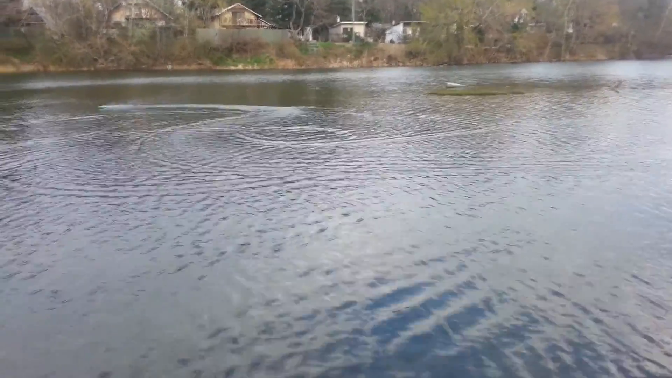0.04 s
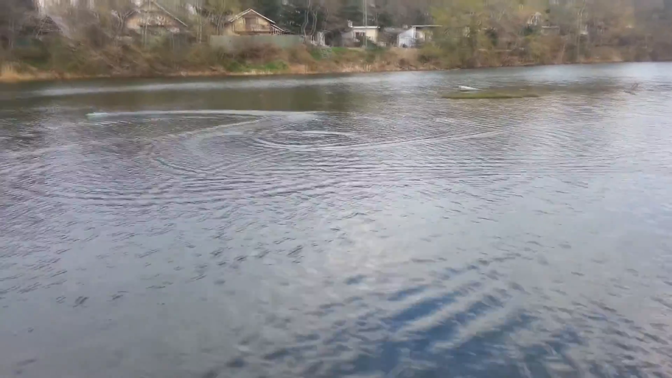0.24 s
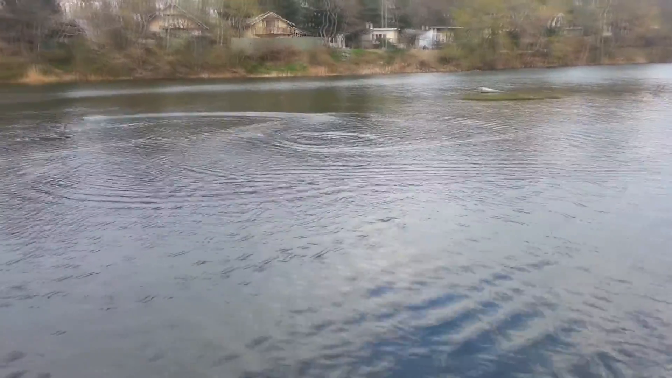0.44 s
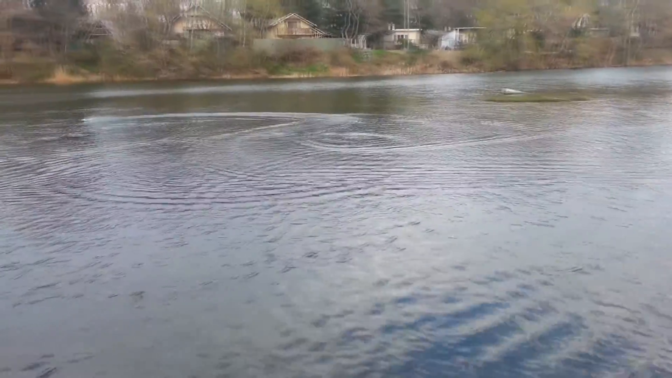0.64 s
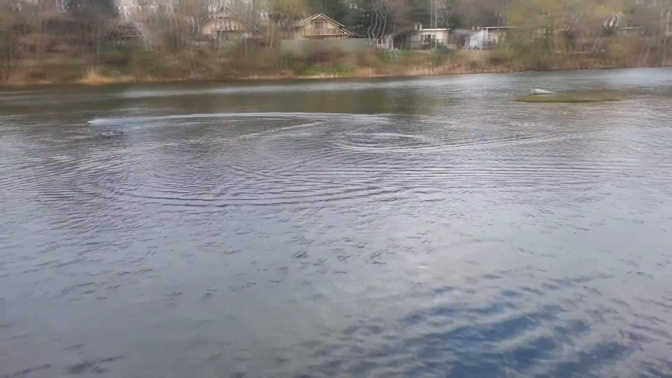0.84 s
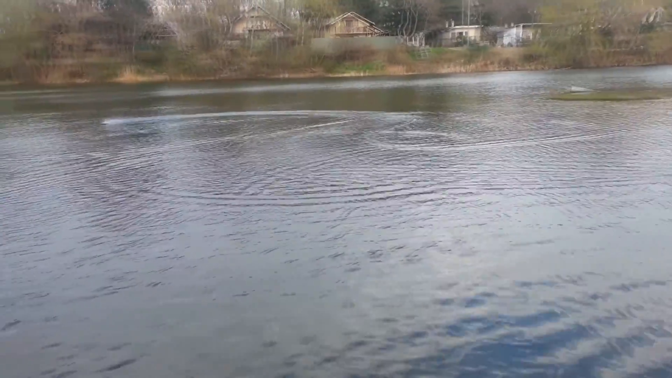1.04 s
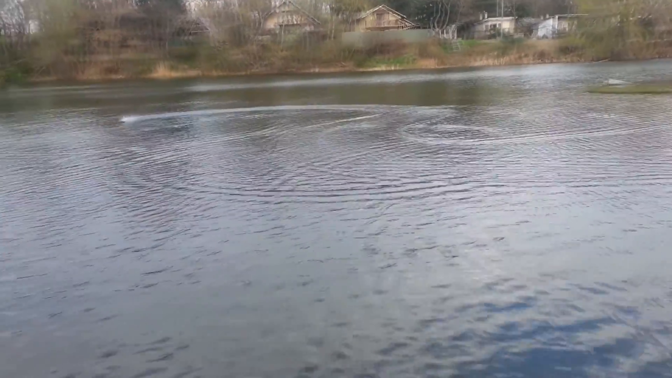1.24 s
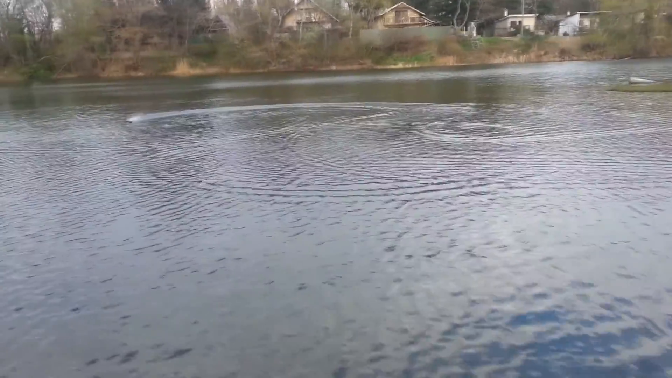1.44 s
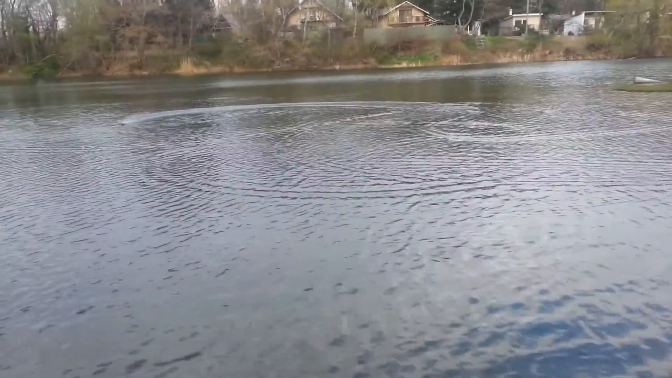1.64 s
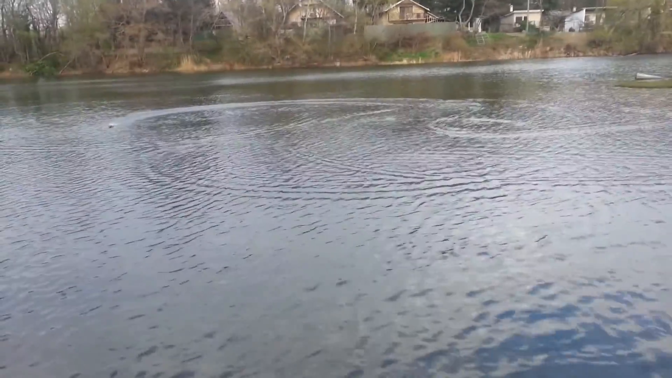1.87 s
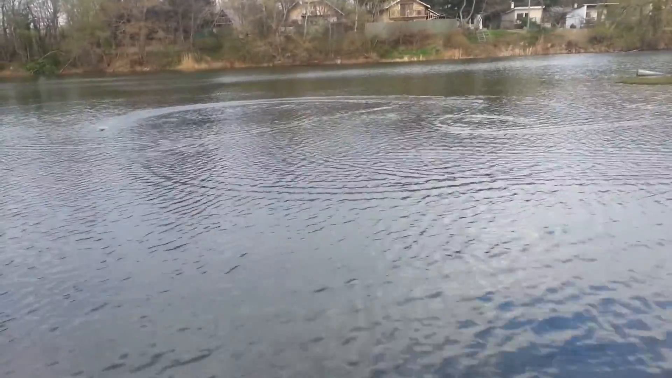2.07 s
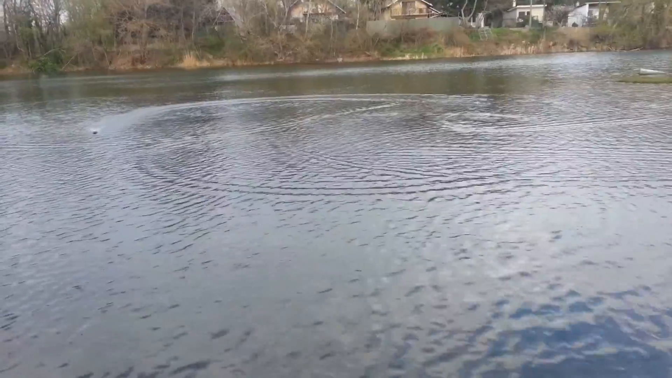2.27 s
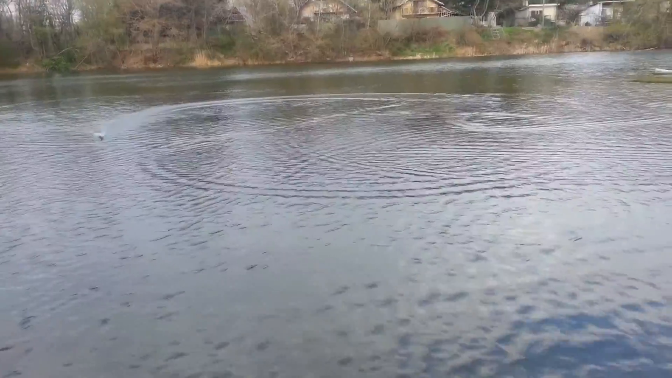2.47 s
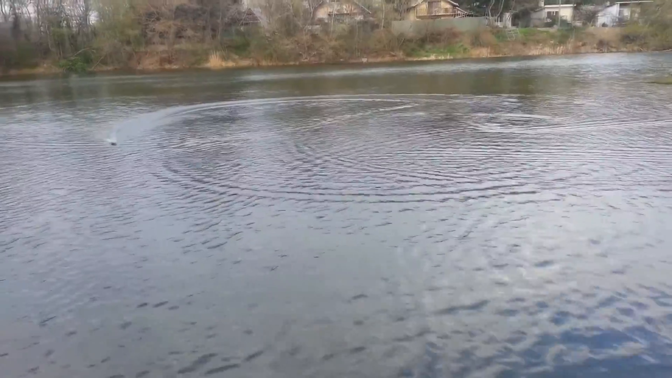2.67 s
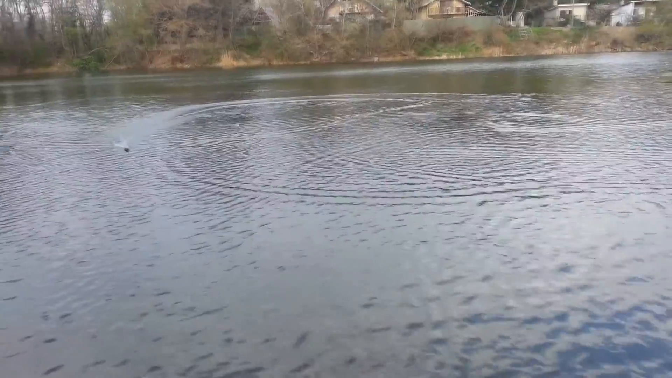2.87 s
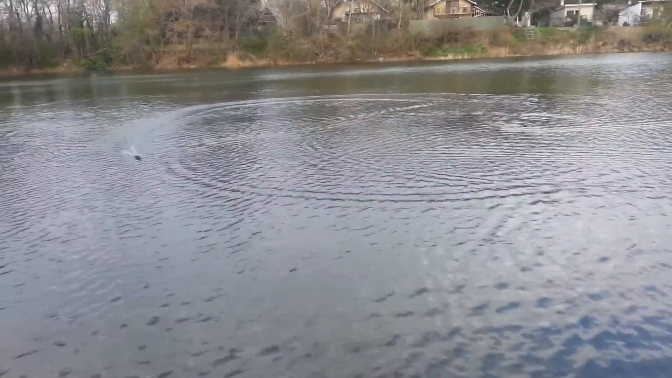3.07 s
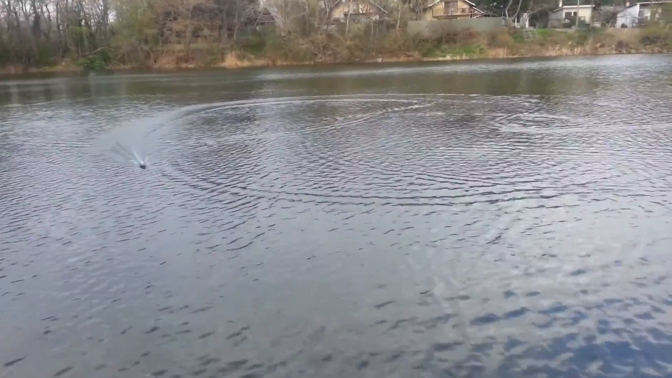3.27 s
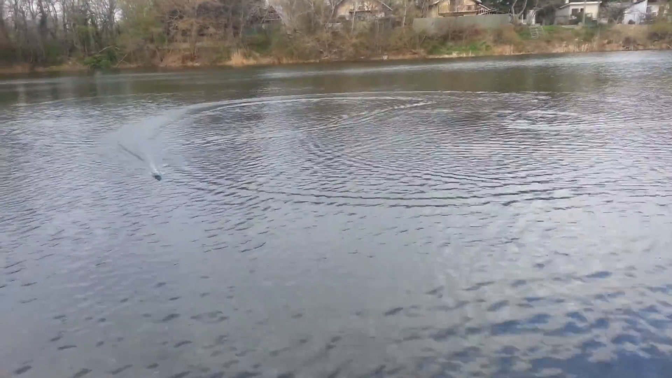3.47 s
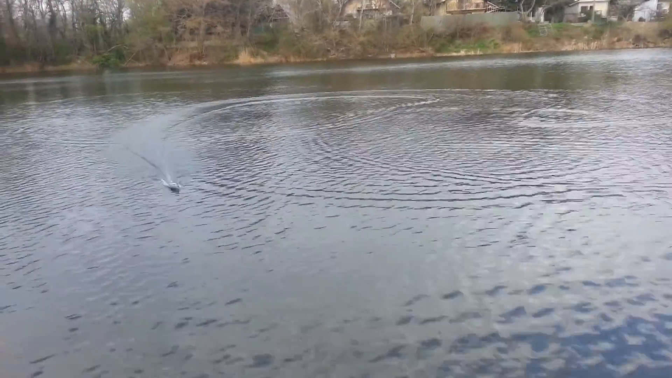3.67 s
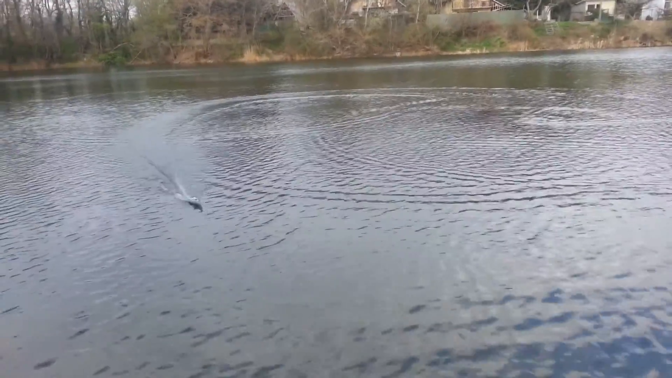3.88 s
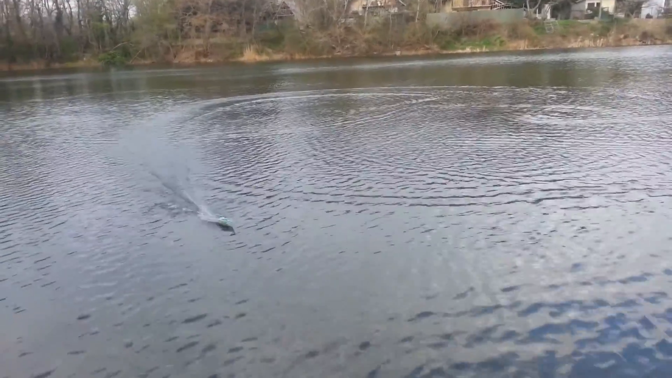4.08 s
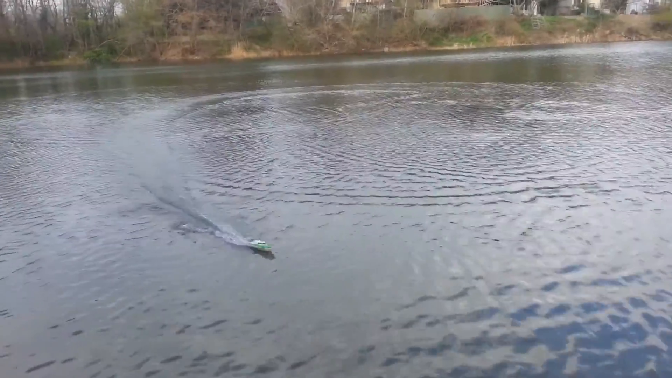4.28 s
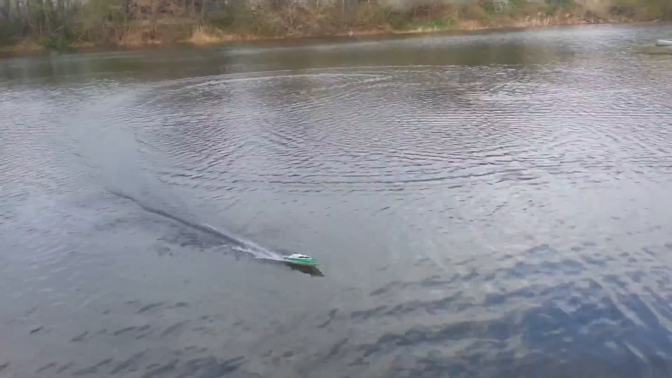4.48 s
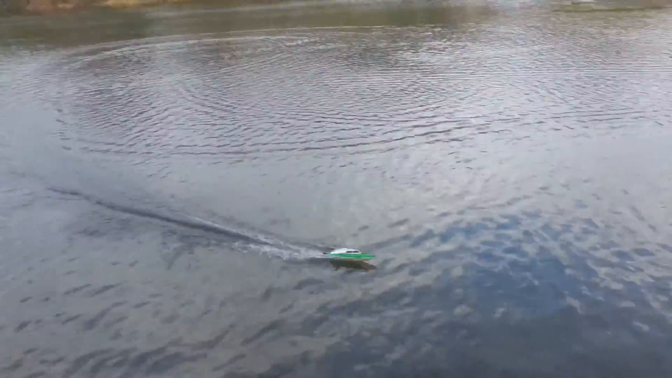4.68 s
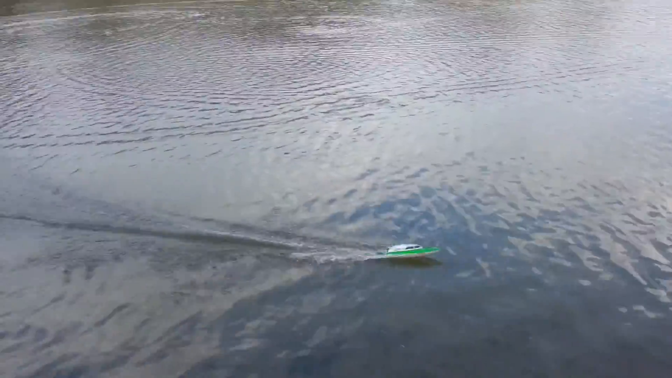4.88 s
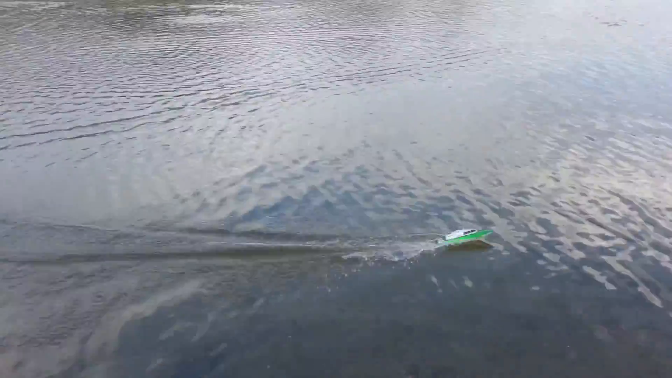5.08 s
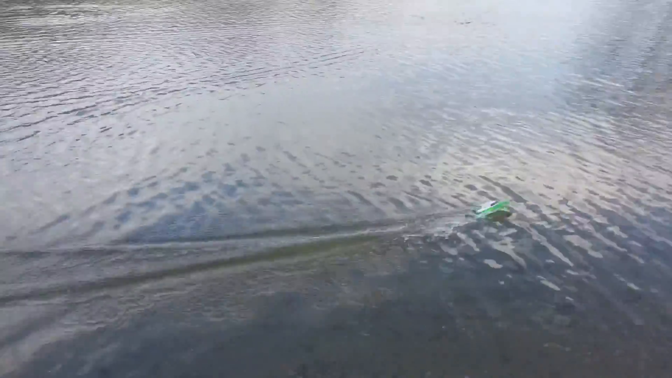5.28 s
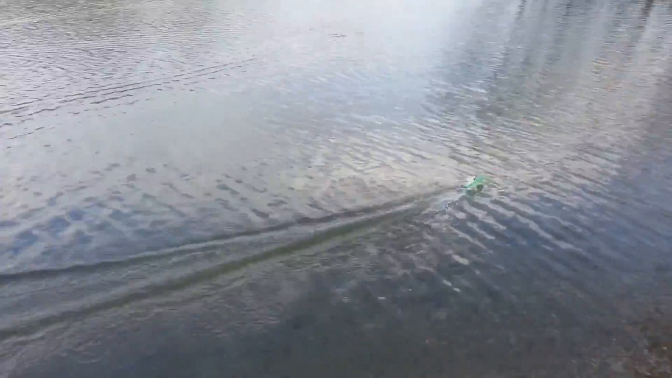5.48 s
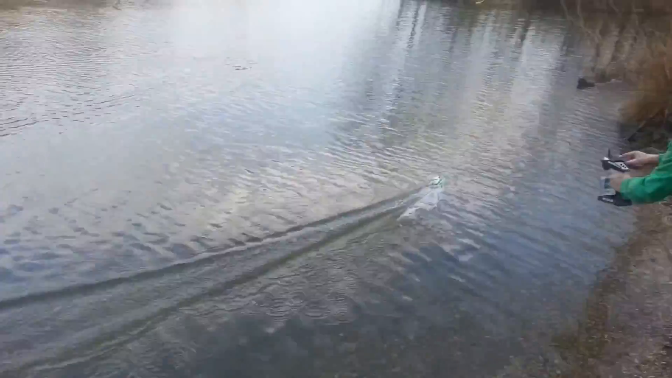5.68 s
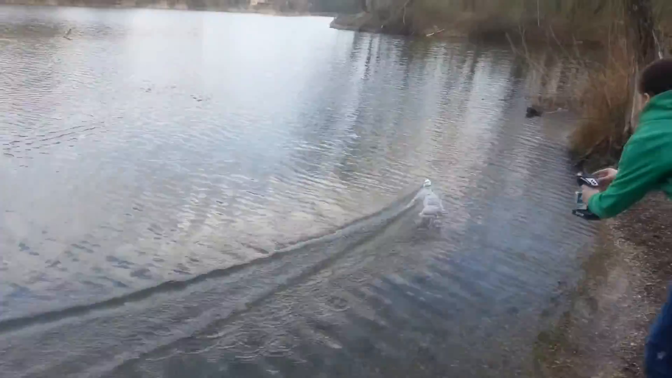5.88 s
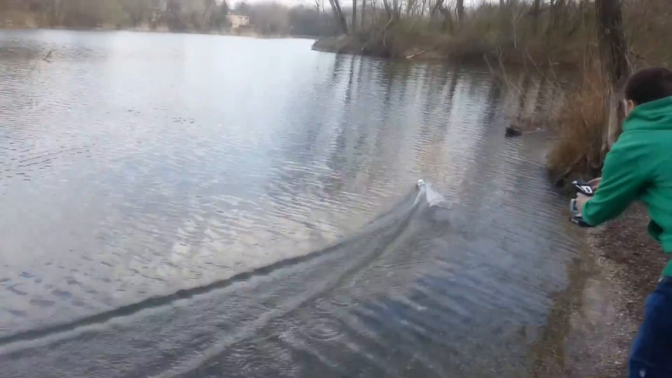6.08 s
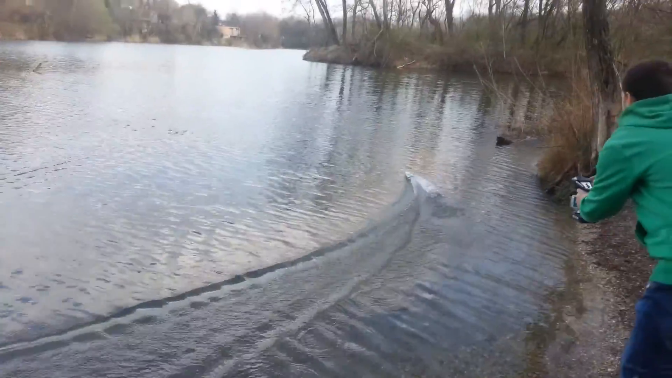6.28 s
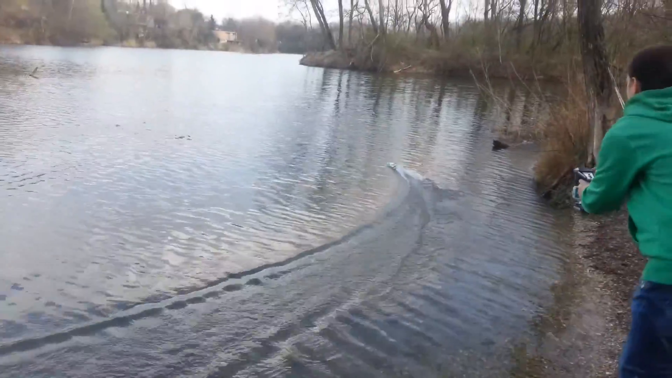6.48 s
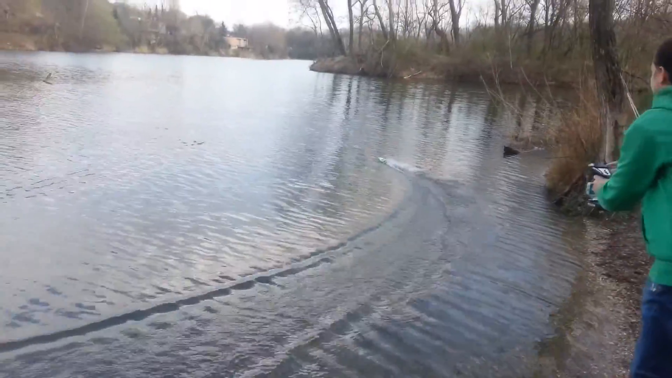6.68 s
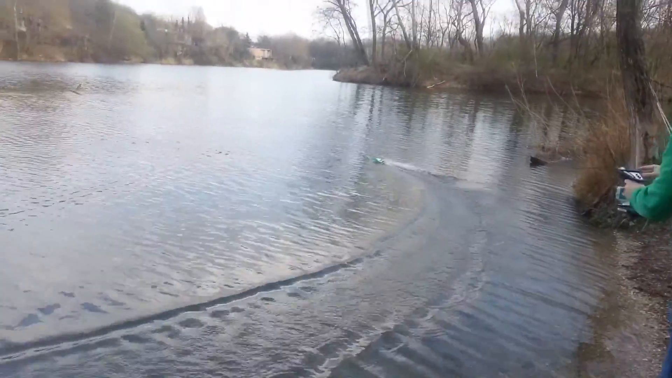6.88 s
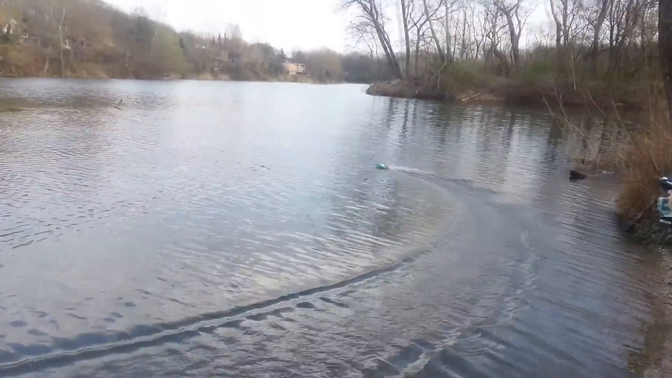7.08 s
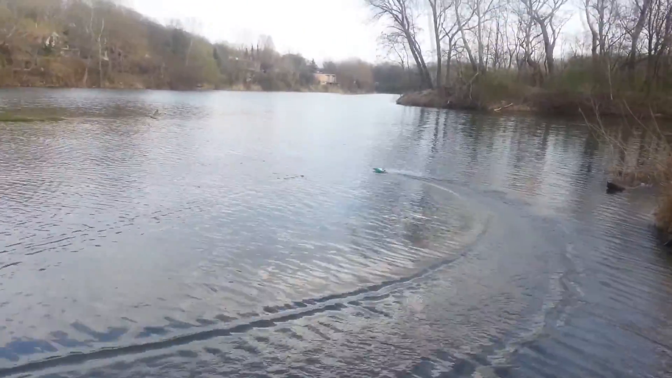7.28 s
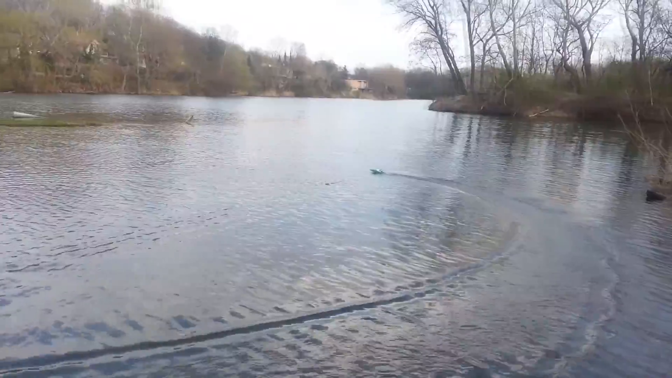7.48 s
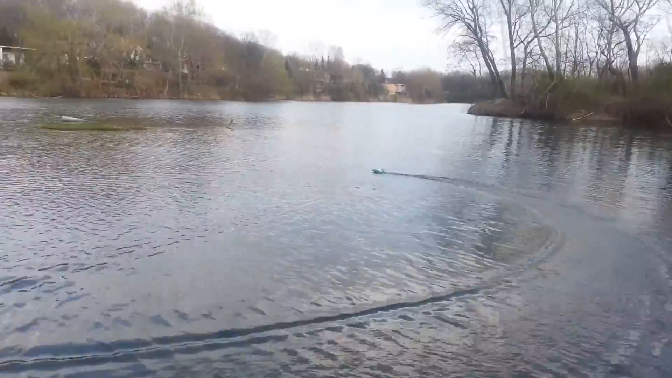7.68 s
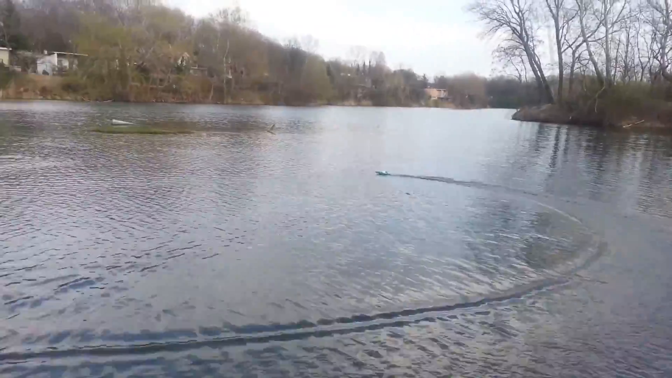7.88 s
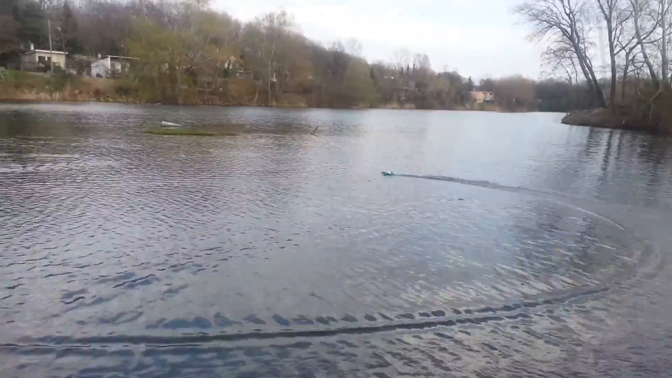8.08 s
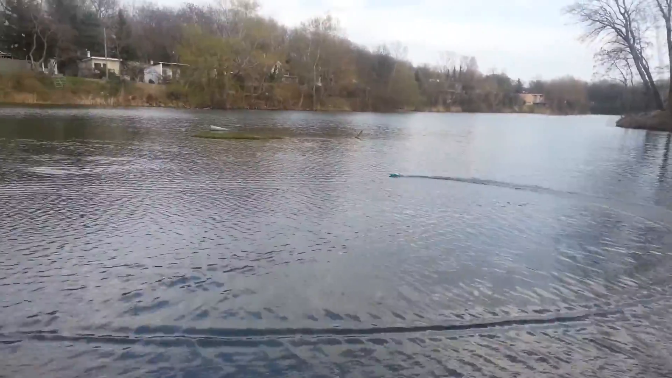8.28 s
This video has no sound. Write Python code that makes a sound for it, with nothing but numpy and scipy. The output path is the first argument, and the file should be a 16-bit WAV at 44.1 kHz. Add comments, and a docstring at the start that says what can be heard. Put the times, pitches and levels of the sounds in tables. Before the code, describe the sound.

A faint, nearly constant-pitched electric whine and propeller buzz carry across open water, wavering slightly. Splashy hiss pulses several times a second and builds as the model boat approaches. The close pass is loudest, with dense churning, crackling bubbles and bright spray; the pitch then slips down only slightly as the boat heads off and quiets. Stereo shore microphone, open air, soft distant rumble, occasional small water plops.

```python
"""A thin electric whine and a hiss of spray come from some 30 m out over a lake: a model speedboat at full throttle.
It loops in close to the shore, 4 m off at its nearest, and heads away. Shaft harmonics make the whine,
a chattering series of higher orders the propeller buzz, and shaped noise the churn, spray and mist.
Slaps on the ripples make the hiss surge and the motor sag. Bubbles, ticks and a far rumble lie around it.
The microphone is a two-port camera on the shore, whose body shades and delays the sound by bearing."""
import sys
import numpy as np
from scipy import signal
from scipy.fft import rfft, irfft
from scipy.io import wavfile
from scipy.ndimage import uniform_filter1d

SR = 44100
rng = np.random.default_rng(int(sys.argv[2]) if len(sys.argv) > 2 else 0)


def master(y):
    """Save y as 16-bit WAV."""
    cut = np.clip(np.atleast_2d(y).T, -1, 1)
    pcm = np.round(cut * 32767)  # scale
    wavfile.write(sys.argv[1], SR, pcm.astype(np.int16))


N = 367353

# Distant outdoor rumble, relative colour: pitch_hz, level_db (per Hz)
RUMBLE_COLOUR = [(20, -22), (33, -14), (48, -2.5), (59, 3.5), (78, -4), (120, -0.5), (160, -3.5), (270, -4),
                 (400, -9.5), (550, -16.5), (1000, -8), (1800, -16.5), (5000, -44)]
# Small ticks and plops of water: start_s, level_db, pitch_hz, swell_s
TICKS = [(.1993, -27.5, 5130, 0.00024), (2.128, -34.5, 4720, 0.0003), (8.028, -33, 4450, 0.00026),
         (1.902, -50, 504, 0.0011), (4.464, -37, 2420, 0.002), (4.65, -33, 2380, 0.002),
         (4.762, -38, 1760, 0.004), (5.088, -40, 1294, 0.0027), (7.683, -43, 2360, 0.0022),
         (8.176, -37, 4600, 0.0006), (8.179, -45, 1750, 0.002)]

# Boat to camera: time_s, distance_m
DISTANCE = [(0, 32), (1.5, 29.4), (2.1, 25.5), (2.7, 17.1), (3.3, 13.8), (3.9, 10.74), (4.4, 6.75),
            (4.9, 4.28), (5.3, 4.92), (5.8, 7.14), (6.3, 10.5), (6.9, 12), (7.5, 18.6), (8.33, 22.9)]
# Side of the boat facing the shore: time_s, side (0 bow, 1 beam, 2 stern; clipped to that range)
ASPECT = [(0, 0.16), (3.9, 0.16), (4.7, 1), (5.15, 1.09), (5.7, 1.64), (6.3, 2.18), (8.33, 1.84)]
# Shaft speed before sag and wobble, slower in the turns, with the Doppler drop of the pass: time_s, speed_hz
SHAFT_SPEED = [(0, 287.2), (0.3, 285.2), (0.7, 290.9), (1.3, 291.3), (1.7, 289.2), (2.3, 288.7),
               (3.1, 290.4), (3.3, 286), (3.55, 286.6), (3.75, 289), (3.95, 291.7), (4.7, 288),
               (5.0, 287.8), (5.35, 284.1), (6.0, 284.7), (7.2, 283.7), (7.8, 286.4), (8.33, 283)]
# Slaps of the hull on the ripples: start_s, hold_s, spray_db (more thrown), bite_db (deeper propeller bite)
SLAPS = [(0.153, 0.056, -0.5, 1.66), (0.548, 0.022, 2.5, 1.9), (0.73, 0.04, 2, 1.0),
         (0.967, 0.082, 3, 1.58), (1.144, 0.014, 3, 0.47), (1.351, 0.024, 1, 0.1), (1.54, 0.057, 5, 3),
         (1.762, 0.043, 3.5, 3), (1.922, 0.066, 5.5, 2.5), (2.057, 0.1, 2.5, 0.5),
         (2.338, 0.035, 1.5, -0.35), (2.705, 0.016, 1.5, 3.5), (2.886, 0.051, 4, 0.9),
         (3.109, 0.05, 3, 1.07), (3.301, 0.03, 4.5, 2.0), (3.437, 0.04, 2.5, 5.0), (3.616, 0.051, 4, 5),
         (3.805, 0.05, 6.5, 3.5), (4.006, 0.05, 6, 3.5), (4.195, 0.055, 3, 2), (4.401, 0.03, 2, 1),
         (4.574, 0.048, 1, 2.5), (4.782, 0.021, -0.7, 3.5), (4.975, 0.049, 3, 4), (5.143, 0.056, 0.5, 3),
         (5.259, 0.02, 1, 2), (5.339, 0.033, 3.5, 3.5), (5.53, 0.029, 0.5, 1.5), (5.696, 0.0085, 2.5, 2.5),
         (5.848, 0.037, 2.5, 2), (6.223, 0.059, 1.5, 2.5), (6.476, 0.063, 1, 1), (6.66, 0.039, 1.5, 0.5),
         (7.865, 0.051, 0, 1), (8.143, 0.0082, 2, 5.5)]
# Propeller load, heavy at the start and again just before the pass: time_s, level_db (more churn and buzz)
LOAD = [(0, 3.5), (1.4, -0.5), (2.5, 0.5), (3.6, 0.7), (4.55, 2.5), (5.1, -0.5), (5.75, -0.5), (6.3, 0.5),
        (7.1, 0), (8.33, 2)]

# How each part carries: bow_db, beam_db, stern_db (each at 10 m), loss_db (per doubling of distance),
# bow_on_db, stern_on_db (changes at those moments), surge_db (per dB of surge)
CHURN_CARRY = (-53.5, -54.5, -54, 6, 0.5, -2.5, 0.7)  # water churned by the propeller
SPRAY_CARRY = (-47.5, -53, -48.5, 5.5, 1.5, -2, 1.02)  # hiss of the spray
MIST_CARRY = (-63, -66, -59, 8.5, -1, -2.5, 0.63)  # finest spray, strongest from the rooster tail behind the boat
BUZZ_CARRY = (-50.5, -52, -48.5, 7, -1, -7, 1.0)  # rough buzz of the propeller
# Low shaft orders radiated by the hull: order, swing_db (as it rocks), rough (0-1, beam-on, before division
# by order), hop_db (lost from afar in each hop; negative gains), then the columns of CHURN_CARRY
WHINE = [(1, 0.79, 0.041, -1, -56.5, -57.5, -68.5, 10.35, -2.5, 6, 0.62),
         (2, 1.3, 0.54, 3, -61, -63.5, -57.5, 3.96, -11, -3.5, 0.63),
         (3, 0.88, 0.48, 3, -66, -73.5, -57.5, 1.94, -6.5, -0.5, 0.71),
         (4, 1.55, 0.3, -4, -57, -61, -68, 8.6, 2, 7, -0.8),
         (5, 0.21, 0.17, 15, -55, -50.5, -52, 7.3, -5.5, -9.5, 0.052)]
# Higher propeller orders, relative to the buzz: order, bow_db, beam_db, stern_db
SHAFT_ORDERS = [(6, -14, -13.5, -13.5), (7, -9, -11, -9.5), (8, -15, -12.5, -10.5), (9, -14, -7.5, -16.5),
                (10, -11, -16, -11.5), (11, -15, -18.5, -15), (12, -16.5, -21, -19), (13, -15, -23, -9),
                (14, -14.5, -17.5, -14), (15, -10, -15.5, -16), (16, -12, -19, -11), (17, -2.5, -26, -12),
                (18, -17, -20, -9)]
# Brief swells and dips of single shaft orders: centre_s, order, half_length_s, level_db
SWELLS = [(0.038, 3, 0.036, 11.5), (0.217, 3, .045, 8), (0.247, 7, 0.28, 3), (0.265, 5, .045, -12),
          (0.37, 2, .07, 5), (1.095, 7, .4, -5), (3.265, 5, 0.036, -5), (3.34, 7, 0.041, 7),
          (3.384, 6, .02, 7), (3.478, 11, .025, 10), (3.486, 7, .035, 5), (3.691, 7, .04, 5),
          (3.658, 3, .03, 6), (3.675, 8, .03, 9), (3.742, 10, 0.018, 8), (3.851, 2, 0.039, 5.5),
          (3.856, 11, 0.018, 10), (3.857, 8, .022, 13), (3.868, 3, 0.036, 6), (4.034, 10, .014, 6),
          (4.05, 8, .025, 7), (4.055, 11, 0.033, 11.5), (4.06, 3, .045, 6.5), (4.08, 2, .04, 8.5),
          (4.24, 7, 0.022, 11.5), (4.262, 6, .03, 5), (4.454, 6, .03, 4), (4.527, 10, .025, 12),
          (4.601, 9, .013, 5), (4.642, 6, 0.036, 6), (4.648, 10, .014, 11), (4.696, 2, 0.015, -6),
          (4.723, 5, 0.025, 3.5), (4.825, 6, .014, 10), (5.04, 5, 0.03, 2.5), (5.08, 3, 0.023, 15),
          (5.097, 5, 0.028, -4.5), (5.175, 9, .025, 5), (5.21, 10, 0.021, 4), (5.26, 5, .012, -9),
          (5.294, 8, 0.018, 8), (5.3, 4, .2, -10), (5.33, 5, 0.01, -15), (5.503, 7, .025, 10),
          (5.515, 5, .018, -10), (5.566, 8, 0.02, 10), (5.625, 5, 0.022, -10), (5.68, 7, .03, 12),
          (5.727, 2, 0.098, -10), (5.9, 8, .025, 9), (5.901, 2, 0.031, 6), (6.105, 5, 0.028, -5),
          (6.41, 6, 0.039, 12), (6.5, 3, 0.027, 7.5), (6.619, 6, 0.049, 5), (6.636, 5, 0.023, -11),
          (6.652, 10, .03, 8), (6.903, 2, 0.038, 6.5), (7.69, 2, 0.039, -8), (7.703, 5, .04, -7),
          (8.231, 6, 0.083, 9), (8.3, 5, .15, -5)]

# Relative colour of churn and spray: pitch_hz, bow_db, beam_db, stern_db
WATER_COLOUR = [(394, -18.5, -6, -11.5), (790, -14.5, -7.5, -8), (1330, -15, 4.5, -10),
                (2290, -6.5, 9.5, 4), (2390, -11.5, 9, -2), (2700, -6.5, 7.5, -3), (3360, -5, 3, -3.5),
                (3630, -9.5, 1, -1.5), (3820, -2, 1.5, -1), (4720, 6.5, 3, 5), (5330, 9.5, -1.5, 0.5),
                (5820, 5.5, -2, 3), (6260, -2.5, -5, -5), (6460, -7, -3.5, -6), (7030, -10, -6.5, -11.5),
                (7800, -17, -10, -12.5), (8200, -17, -9, -11.5), (10660, -17.5, -7, -14.5),
                (12300, -26.5, -10, -9), (13935, -30, -23, -19)]
# Moving bands of the water noise: time_s, pitch_hz, lift_db
HOLLOW = [(4.2, 2804, -5), (4.48, 2613, 3), (5.0, 2420, 4), (5.55, 2253, 3), (5.85, 2200, -1),
          (6.3, 2081, -3.5), (7.3, 2115, -1)]  # hollow ring of the churn under the hull, mostly sinking through the pass
MIRROR = [(4.3, 5887, 2), (4.6, 6650, 5), (4.9, 7846, 4), (5.3, 7600, -1.5)]  # hiss sweeping through the pass, as from a reflection off the lake
TAIL = [(4.6, 5602, -1), (5.0, 5297, 5), (5.75, 5480, 5), (6.3, 5230, 4.5), (7.0, 5100, 2.5),
        (8.33, 5154, 2)]  # rooster-tail hiss, lower as the boat turns away
SIZZLE = [(4.9, 6100, -4), (5.4, 6200, 2), (6.2, 6260, -4), (6.8, 6636, 4)]  # thin sizzle above it, rising as the boat heads away
# Sheet of spray thrown in the near turn: centre_s, half_length_s, pitch_hz, width_hz, level_db
SHEET = (5.9, 0.055, 4040, 490, 6)

# Boat's bearing, as the delay of the left port: time_s, lag_ms
BEARING = [(0, 0.21), (2.8, 0.21), (3.8, 0.16), (4.3, 0.14), (4.8, 0.071), (5.3, 0.026), (5.8, 0.0054),
           (6.5, 0.03), (8.33, 0.029)]
# Left port minus right: pitch_hz, aside_db (boat to one side), ahead_db (boat ahead)
PORT_TILT = [(280, -2.5, 1), (398, 5, -2), (567, 12, 13.5), (850, 5, 2.5), (1490, 11, 7), (2270, 17, 12),
             (2406, -3, 0), (2740, 15, 17), (3420, 3.5, 4.5), (4400, 16, 7), (5250, 11.5, -1),
             (6060, 5.5, -9), (7500, -11, 2.5), (9600, 1.5, -1.5), (13000, 4, 4)]
# Phase lead of the left port, beyond the bearing: pitch_hz, aside_rad, ahead_rad
PORT_PHASE = [(380, 0, 0), (600, 0.4, 0.3), (1150, 0.9, 1.1), (1600, 0.2, 1.1), (2050, 1.0, 1.1),
              (2300, -0.8, 0.8), (2900, 1.3, 1.2), (3250, -0.6, -1.1), (3750, 1.4, 0.8), (4600, -0.3, 0.2),
              (5000, 0.3, 0.5), (5400, -1.1, 0.1), (6000, 0.5, -0.9), (6700, -1.3, -2.7),
              (9500, -2.8, -2.8)]
# Likeness of the water noise at the two ports: pitch_hz, likeness (0-1)
LIKENESS = [(300, 0.62), (1500, 0.07), (2400, 0.78), (3100, 0.33), (5000, 0.78), (8000, 0.22), (13000, 0.1)]

RUMBLE_DB = -61
EDGE_HZ = 14400  # upper limit of the camera
AIR_DB_PER_M = 0.32  # absorption at 10 kHz, growing with the square of frequency
BOW_ON, STERN_ON = (3.39, 0.26), (6.1, 0.57)  # boat points straight at or away: centre_s, half_length_s
SLAP_ATTACK_S, SLAP_RELEASE_S = 0.0254, 0.0447
ROCK_HZ = 5.3  # the hull rocks at about this rate
HOP_LEAD_S, HOP_HALF_S = 0.061, 0.023  # the hull lifts clear of the water just before each slap
CHATTER_DB, CHATTER_HZ = 3.5, 34  # the propeller grips and slips; half this depth from astern
CRACKLE_DB, CRACKLE_SCATTER = -57, 0.1  # bubbles beam-on at 10 m before the bite; relative pitch spread
CRACKLE_PER_S, CRACKLE_CYCLES = 150, 4  # mean bubbles a second; cycles of ring to fall to 1/e

TIME = np.arange(N) / SR
BIN_HZ = np.fft.rfftfreq(512, 1 / SR)
FRAME_S = np.arange(N // 128 + 2) * 128 / SR


def amp(db):
    """Decibels to gain."""
    return 10 ** (np.asarray(db) / 20)


def unit(x):
    """Scales to an rms of one."""
    return x / np.sqrt(np.mean(np.abs(x) ** 2) + 1e-20)


def curve(rows, t):
    """Reads a time curve along straight lines."""
    return np.interp(t, *np.transpose(rows))


def colour(rows, hz, axis=1):
    """Reads one column of a spectrum on a log-frequency axis."""
    table = np.transpose(rows)
    return np.interp(np.log(hz + 1), np.log(table[0] + 1), table[axis])


def wander(t, rate_hz):
    """Slow chance movement of rms one, at about the given rate."""
    hz = rate_hz * np.geomspace(1 / 2, 2, 20)
    turns = hz * FRAME_S[:, None] + rng.random(len(hz))
    slow = np.sin(2 * np.pi * turns).sum(1)
    return np.interp(t, FRAME_S, unit(slow))


def bump(centre_s, half_s):
    """A smooth moment, one at its centre, over the frames."""
    return np.exp(-((FRAME_S - centre_s) / half_s) ** 2)


def spectra(x):
    """Short-time spectra, frames x bins."""
    return signal.stft(x, nperseg=512, noverlap=384)[2].T[:len(FRAME_S)]


def waves(z):
    """Short-time spectra of both ports back to sound."""
    return signal.istft(np.swapaxes(z, 1, 2), nperseg=512, noverlap=384)[1][:, :N]


def ports(direct, scattered, likeness):
    """The camera body shades and delays the sound between its two ports, according to the bearing."""
    lag_ms = curve(BEARING, FRAME_S)[:, None]
    aside = np.clip(lag_ms / BEARING[0][1], 0, 1)
    aside = np.sin(np.pi / 2 * aside) ** 2  # the shadow sets in only well off the axis
    ahead = 1 - aside
    tilt_db = aside * colour(PORT_TILT, BIN_HZ) + ahead * colour(PORT_TILT, BIN_HZ, axis=2)
    tilt = amp(tilt_db / 2)  # half up on the left, half down on the right
    lead = aside * colour(PORT_PHASE, BIN_HZ) + ahead * colour(PORT_PHASE, BIN_HZ, axis=2)
    turn = np.exp(1j * lead - 2j * np.pi * BIN_HZ * lag_ms / 1000)
    same = np.clip(likeness, 0, .999)
    right = same * direct + np.sqrt(1 - same ** 2) * scattered
    centre = np.sqrt(tilt ** 2 + tilt ** -2 + 2 * same * turn.real) / 2  # keeps the sum of the ports level
    return waves(np.array([direct * tilt * turn, right / tilt]) / np.maximum(centre, .5))


def rumble(likeness=0.76, left_db=1, swell_db=.5, skew=0.61, skew_hz=200):
    """Far-off outdoor rumble: coloured noise, nearly alike at both ports, which differ in phase in the bass."""
    hz = np.fft.rfftfreq(N, 1 / SR)
    left, other = rfft(rng.standard_normal((2, N))) * amp(colour(RUMBLE_COLOUR, hz))
    turn = np.exp(-1j * skew / (1 + (hz / skew_hz) ** 2))
    right = likeness * left + np.sqrt(1 - likeness ** 2) * other
    pair = unit(irfft(np.array([left * turn, right]), N))
    balance_db = left_db * np.array([[1], [-1]])
    return pair * amp(RUMBLE_DB + swell_db * wander(TIME, 1.8) + balance_db)


def ticks(patter=0.32, patter_s=0.0034):
    """Each tick or plop of water is a few cycles of ring, roughened by a brief dying patter."""
    out, t = np.zeros(N), np.arange(SR // 20) / SR
    for start_s, level_db, hz, swell_s in TICKS:
        ring = t / swell_s * np.exp(1 - t / swell_s)
        grain = unit(uniform_filter1d(rng.standard_normal(len(t)), size=14))
        after = patter * grain * np.exp(-t / patter_s)
        tick = amp(level_db) * (ring + after) * np.sin(2 * np.pi * hz * t)
        out[round(start_s * SR):][:len(t)] += tick
    direct = spectra(out)
    return ports(direct, 0 * direct, 0.75)


def facing(t):
    """Shares of bow, beam and stern in what reaches the shore."""
    aspect = np.clip(curve(ASPECT, t), 0, 2)
    return np.maximum(1 - abs(aspect[:, None] - np.arange(3)), 0)


def bounce(ripple_db=.5):
    """Surge of spray and bite of the propeller, in dB: both change at each slap and rock slightly throughout."""
    throw = bite = ripple_db * wander(FRAME_S, ROCK_HZ)
    for start_s, hold_s, throw_db, bite_db in SLAPS:
        corners = start_s + np.cumsum([0, SLAP_ATTACK_S, hold_s, SLAP_RELEASE_S])
        slap = np.interp(FRAME_S, corners, [0, 1, 1, 0])
        throw = throw + throw_db * slap
        bite = bite + bite_db * slap
    return throw, bite


def shaft(bite, sag_hz=0.32, wobble_hz=0.89, jitter_hz=0.47):
    """Shaft angle: each deeper bite (sag in Hz per dB) slows the motor, and ripples make it waver."""
    sag = sag_hz * np.interp(TIME, FRAME_S, bite)
    waver = wobble_hz * wander(TIME, ROCK_HZ) + jitter_hz * wander(TIME, 30)
    hz = curve(SHAFT_SPEED, TIME) - sag + waver
    return 2 * np.pi * np.cumsum(hz) / SR


def heard(carry, surge):
    """Level of one part at the shore, in dB: set by the side in view, the distance and the bounce."""
    *sides, loss_db, bow_on_db, stern_on_db, surge_db = carry
    doublings = np.log2(curve(DISTANCE, FRAME_S) / 10)
    pointing_db = bow_on_db * bump(*BOW_ON) + stern_on_db * bump(*STERN_ON)
    return facing(FRAME_S) @ sides - loss_db * doublings + pointing_db + surge_db * surge


def crackle(angle, bite, spread_db=5, count=24):
    """Bubbles collapse in clumps, once a turn of the propeller, each ringing near the pitch of the hollow."""
    t, out = np.arange(SR // 50) / SR, np.zeros(N)
    born = rng.random(N) < CRACKLE_PER_S / SR * (1 + np.cos(angle))
    sizes = born * amp(spread_db * np.minimum(rng.exponential(1, N), 2.5))
    when, centre, _ = np.transpose(HOLLOW)
    pitches = np.geomspace(1500, 3500, count)
    wanted = np.interp(TIME, when, centre) * (1 + CRACKLE_SCATTER * rng.standard_normal(N))
    kind = np.searchsorted(pitches, wanted)
    for k, hz in enumerate(pitches):
        ring = np.sin(2 * np.pi * hz * t) * np.exp(-hz * t / CRACKLE_CYCLES)
        out += signal.oaconvolve(sizes * (kind == k), ring)[:N]
    beam = facing(FRAME_S)[:, 1]
    gain = amp(CRACKLE_DB + bite) * beam * 10 / curve(DISTANCE, FRAME_S)
    direct = spectra(unit(out)) * gain[:, None]
    return ports(direct, 0 * direct, 0.92)


def splashes(angle, chop=0.03, drops_per_s=600, drop_size=1.15):
    """Fizz chopped once a turn by the propeller, with single droplets standing out."""
    fizz = rng.standard_normal(N) * (1 + chop * np.cos(angle))
    drops = (rng.random(N) < drops_per_s / SR) * rng.laplace(size=N)
    return spectra(unit(fizz + drop_size * drops))


def crest(rows, width_hz):
    """A moving crest between two dips (inverted where the lift is negative), in dB, frames x bins."""
    when, centre, lift = np.transpose(rows)
    offset = (BIN_HZ - np.interp(FRAME_S, when, centre)[:, None]) / width_hz
    lift_db = np.interp(FRAME_S, when, lift)[:, None]
    return lift_db * (1 - offset ** 2) * np.exp(-offset ** 2 / 2)


def water_shape():
    """Colour of the water noise: the side in view, the moving bands, and air that dulls it with distance."""
    sides = np.array([colour(WATER_COLOUR, BIN_HZ, axis=k + 1) for k in range(3)])
    bands = crest(HOLLOW, width_hz=320) + crest(MIRROR, width_hz=570)
    bands = bands + crest(TAIL, width_hz=320) + crest(SIZZLE, width_hz=300)
    air_db = -AIR_DB_PER_M * np.outer(curve(DISTANCE, FRAME_S), (BIN_HZ / 10 ** 4) ** 2)
    bass = colour([(80, 0.083), (280, 0.59)], BIN_HZ)  # the water noise is thinned below 280 Hz
    return amp(facing(FRAME_S) @ sides + bands + air_db) * bass


def band_level(shape, lo_hz, hi_hz):
    """Rms that white noise has in one band after this colouring."""
    inside = (BIN_HZ > lo_hz) & (BIN_HZ < hi_hz)
    return np.sqrt((shape ** 2 * inside).mean(1, keepdims=True))


def water(angle, throw, bite, patchy_db=2.0, flicker_db=0.29):
    """Churn, spray and mist: splash noise levelled in three bands, patchy and pulsing with the bounce."""
    shape = water_shape()
    churn = amp(heard(CHURN_CARRY, bite) + curve(LOAD, FRAME_S))[:, None] / band_level(shape, 1800, 3300)
    spray = amp(heard(SPRAY_CARRY, throw))[:, None] / band_level(shape, 4000, 6200)
    mist = amp(heard(MIST_CARRY, throw))[:, None] / band_level(shape, 8500, 13000)
    high = colour([(2600, 0.17), (3700, 0.98)], BIN_HZ)  # churn gives way to spray
    top = colour([(6000, 0), (9000, 0.93)], BIN_HZ)  # spray gives way to mist
    blend = churn ** (1 - high) * spray ** (high - top) * mist ** top
    grain = uniform_filter1d(rng.standard_normal(shape.shape), size=8, axis=0)
    patches = unit(uniform_filter1d(grain, size=7, axis=1))
    sputter = patchy_db * patches + flicker_db * wander(FRAME_S, 30)[:, None]
    centre_s, half_s, hz, width_hz, level_db = SHEET
    sheet = level_db * bump(centre_s, half_s)[:, None] * np.exp(-((BIN_HZ - hz) / width_hz) ** 2)
    gain = shape * blend * amp(sputter + sheet)
    return ports(gain * splashes(angle), gain * splashes(angle), colour(LIKENESS, BIN_HZ))


def swells(order):
    """Brief swells and dips of one shaft order, in dB."""
    return sum(db * bump(centre_s, half_s) for centre_s, which, half_s, db in SWELLS if which == order)


def partial(angle, order, level_db, flutter, rough, drift=0.2, steady_db=8):
    """One shaft order, fading on the moving water and roughened by the churn; it rings clearer in a swell."""
    swell_db = swells(order)
    fading = flutter * (wander(FRAME_S, 7) + 1j * wander(FRAME_S, 7))
    rasp = rough * (wander(FRAME_S, 28) + 1j * wander(FRAME_S, 28))
    unrest = order ** 0.91 * np.exp(-np.maximum(swell_db, 0) / steady_db)
    power = 1 + 2 * unrest ** 2 * (flutter ** 2 + rough ** 2)
    wavering = (1 + unrest * (fading + rasp)) / np.sqrt(power)
    # each order leaves the hull by its own path
    path = 2 * np.pi * rng.random() + drift * order * wander(FRAME_S, .5)
    size = amp(level_db + swell_db) * wavering * np.exp(1j * path)
    return np.sqrt(2) * (np.interp(TIME, FRAME_S, size) * np.exp(1j * order * angle)).real


def bank(x, echo_db=-21, far_db=4, delay_s=.07):
    """The wooded bank throws the wavering whine back to beat with itself, more per doubling of distance."""
    echo = amp(echo_db + far_db * np.log2(curve(DISTANCE, TIME) / 10))
    late = np.interp(TIME - delay_s, TIME, x, left=0)
    return (x + echo * late) / np.sqrt(1 + echo ** 2)


def propeller_buzz(angle, bite, flutter=0.12, rough=0.066):
    """Higher shaft orders sharing one chatter as the propeller grips and slips, steadier from astern."""
    out, sides_seen = np.zeros(N), facing(FRAME_S)
    unrest = 1 - sides_seen[:, 2] / 2
    chatter = CHATTER_DB * unrest * np.tanh(wander(FRAME_S, CHATTER_HZ))
    level = heard(BUZZ_CARRY, bite) + curve(LOAD, FRAME_S) + chatter
    for order, *sides in SHAFT_ORDERS:
        out += partial(angle, order, level + sides_seen @ sides, flutter * unrest, rough * unrest)
    return out


def hull_whine(angle, bite, far_swing_db=0.19, flutter=0.062, rough=0.038):
    """Low shaft orders radiated by the hull, swinging as it rocks, pulsing as it hops, rasping when beam-on."""
    out = np.zeros(N)
    far = np.maximum(np.log2(curve(DISTANCE, FRAME_S) / 10), 0)  # doublings of distance beyond 10 m
    _, beam, stern = facing(FRAME_S).T
    hop = sum(bump(start_s - HOP_LEAD_S, HOP_HALF_S) for start_s, *_ in SLAPS)
    hop = hop * np.minimum(far, 1) ** 2 * (1 - stern)
    for order, swing_db, beam_rough, hop_db, *carry in WHINE:
        swing = swing_db + far_swing_db * far * (order - 1) * (1 - stern / 2)
        level = heard(carry, bite) - hop_db * hop + swing * wander(FRAME_S, ROCK_HZ)
        rasp = rough * (1 - beam) + beam * beam_rough / order
        out += partial(angle, order, level, flutter * (1 - beam / 2), rasp)
    return out


def motor(angle, bite):
    """Whine and buzz of one shaft, with the bank's echo; the phase between the ports slowly wanders."""
    direct = spectra(bank(hull_whine(angle, bite) + propeller_buzz(angle, bite)))
    phase = wander(FRAME_S, 2.7) / 2
    return ports(direct, direct * np.exp(1j * phase)[:, None], 1.0)


def scene():
    """The boat over the quiet of the lake; one shaft and one bounce drive all its parts."""
    throw, bite = bounce()
    angle = shaft(bite)
    boat = crackle(angle, bite) + water(angle, throw, bite) + motor(angle, bite)
    return rumble() + ticks() + boat


def record(dry):
    """The camera's band limit: a steep low-pass on both ports."""
    lowpass = signal.firwin(511, EDGE_HZ, window=("kaiser", 9), fs=SR)
    return signal.oaconvolve(dry, lowpass[None], "same")


dry = scene()
out = record(dry)
master(out)
```